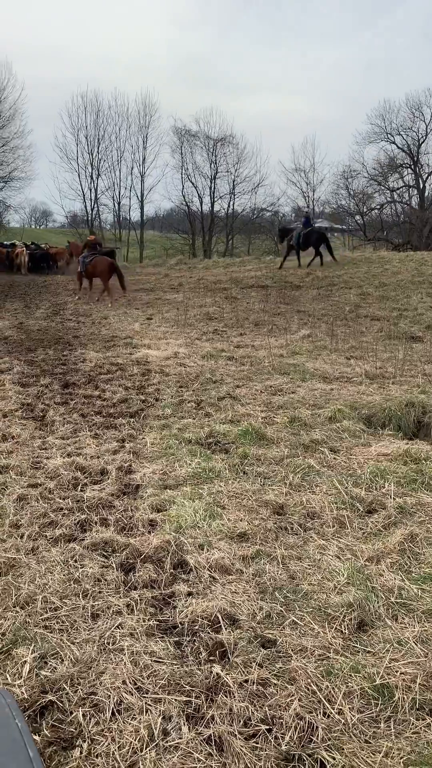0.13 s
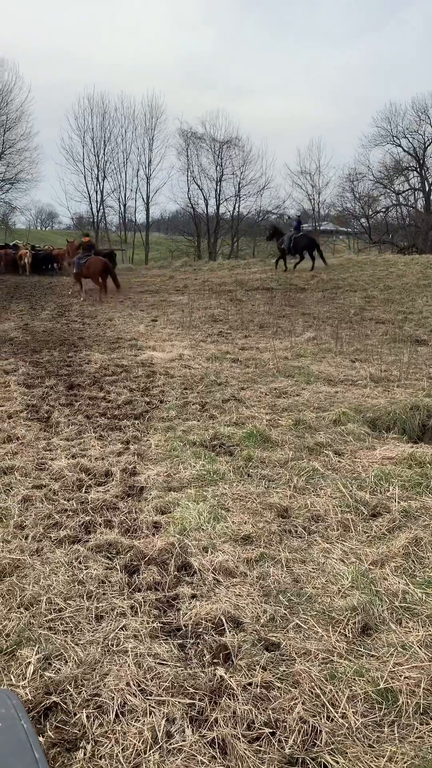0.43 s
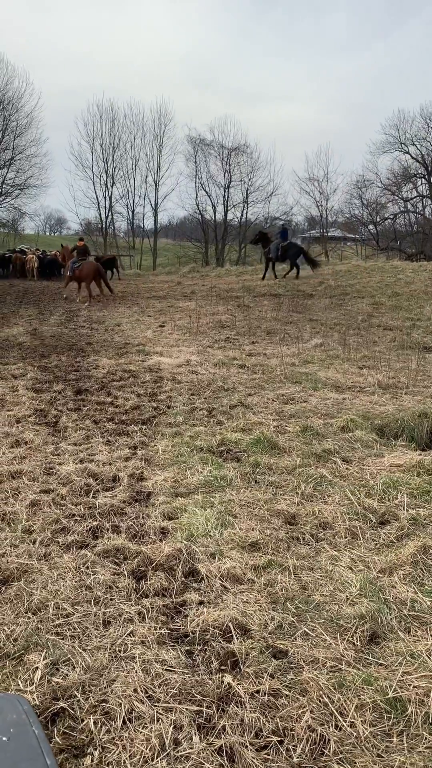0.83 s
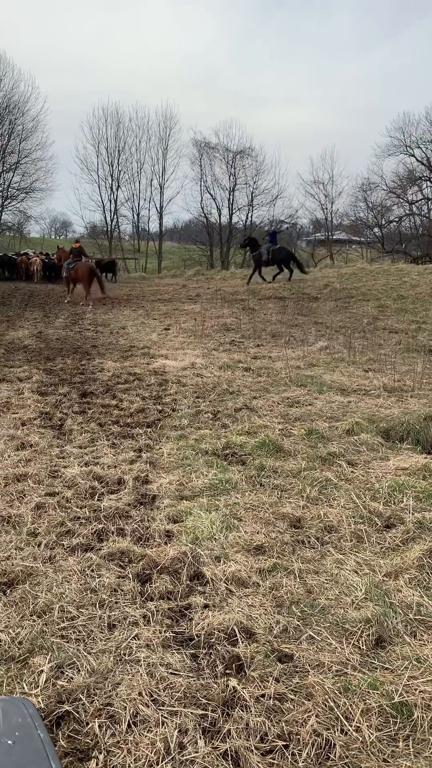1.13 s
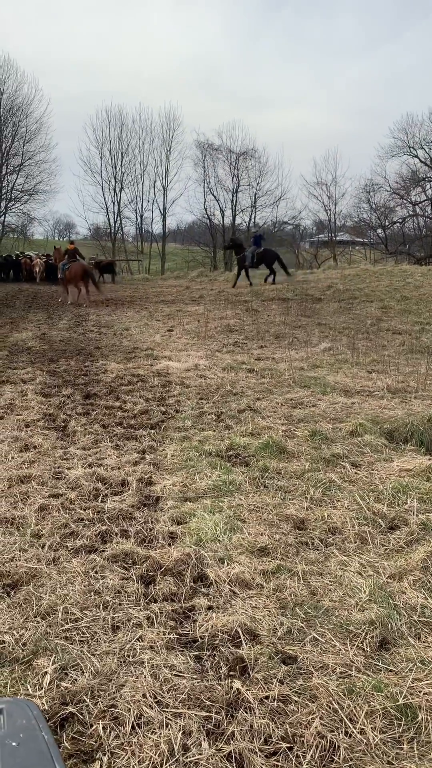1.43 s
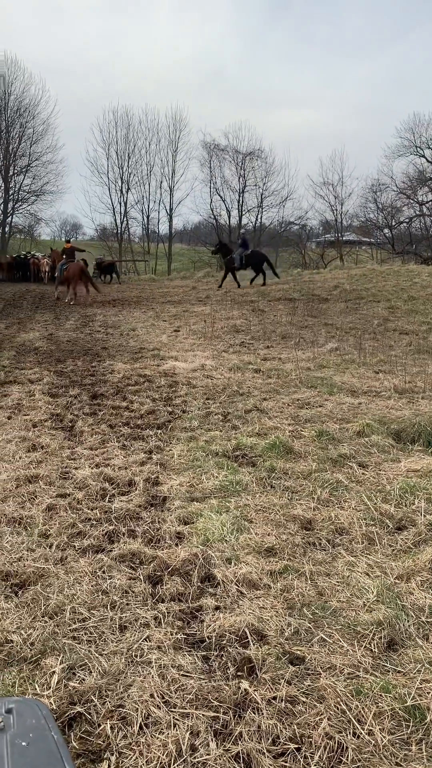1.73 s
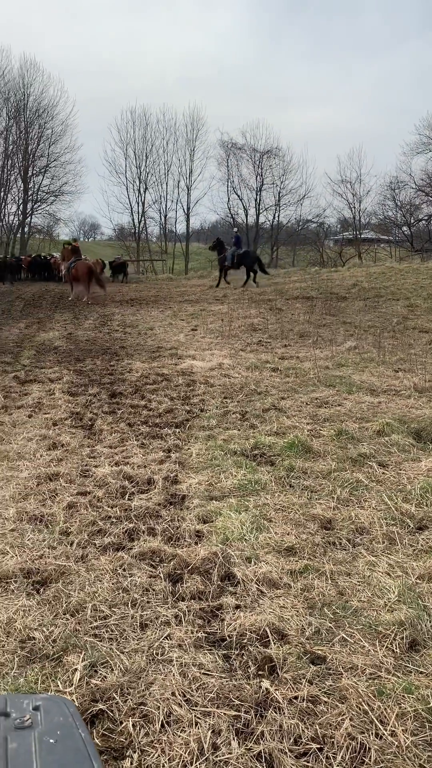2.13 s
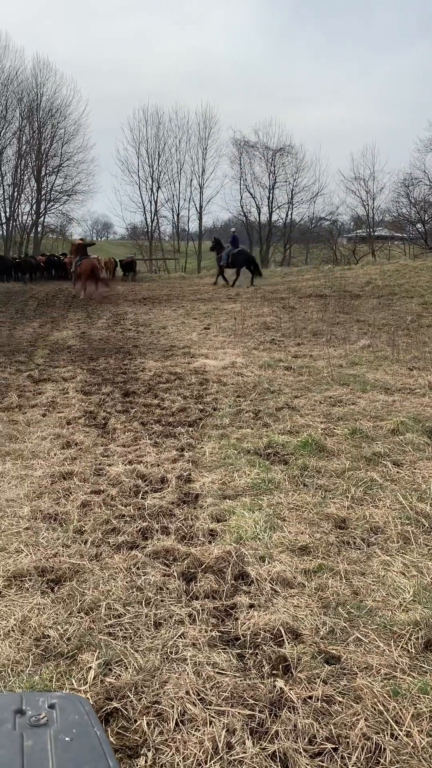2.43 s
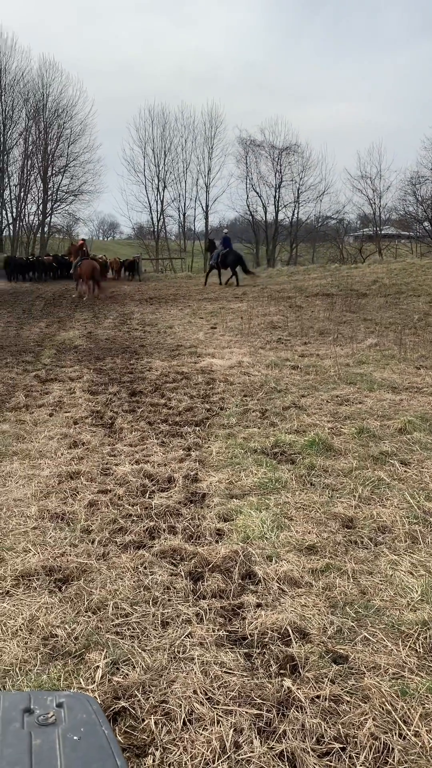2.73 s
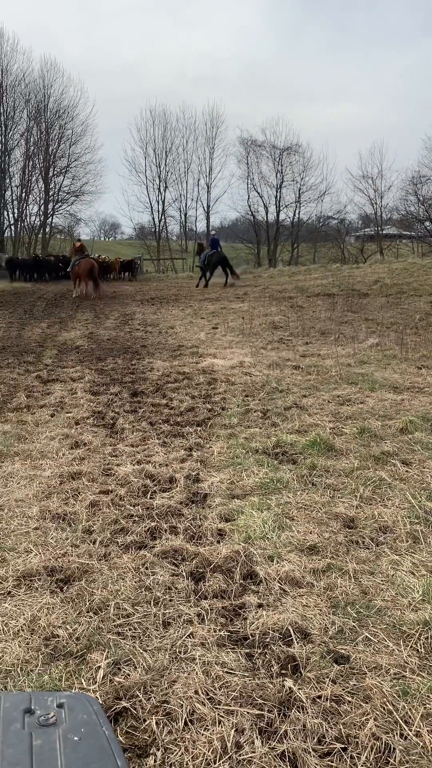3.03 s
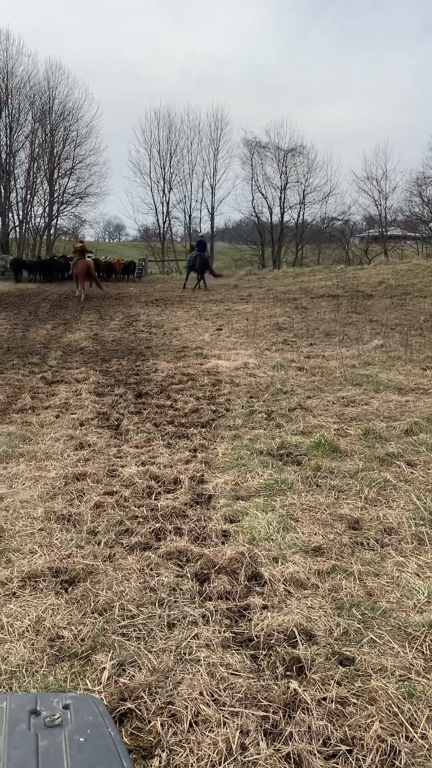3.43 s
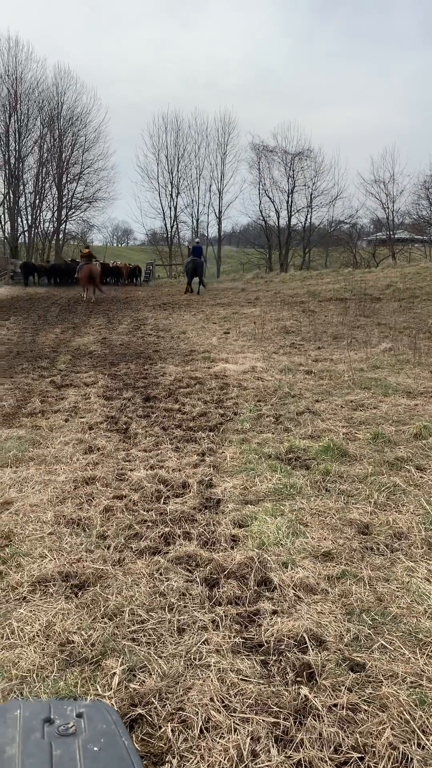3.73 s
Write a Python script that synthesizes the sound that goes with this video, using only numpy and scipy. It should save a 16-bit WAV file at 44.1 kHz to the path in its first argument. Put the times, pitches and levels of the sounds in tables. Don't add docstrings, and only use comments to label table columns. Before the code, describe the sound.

A whip cracks twice far across an open pasture, first a ragged cluster of snaps, then one sharper snap; both echo from ground and trees over low wind, faint hoof ticks and grass rustle, on a phone.

```python
import sys
import numpy as np
from scipy import signal
from scipy.fft import rfft, irfft, next_fast_len
from scipy.io import wavfile
from scipy.ndimage import uniform_filter1d

SR = 44100
rng = np.random.default_rng(int(sys.argv[2]) if len(sys.argv) > 2 else 0)


def file_out(sig):
    cols = np.atleast_2d(sig).T
    lim = np.clip(cols, -1, 1)
    pcm = np.round(lim * 32767).astype(np.int16)
    wavfile.write(sys.argv[1], SR, pcm)


def gain_from_decibels(decibels):
    exponent = np.asarray(decibels, float) / 20
    return 10 ** exponent


N = 171990
T = np.arange(N) / SR
M = next_fast_len(N + SR // 4)
F = np.maximum(np.arange(M // 2 + 1) * SR / M, 1)

# start in seconds, level in dB, hold in seconds, decay in seconds,
# tilt in dB per octave.
CRACK_BURSTS = [(1.042, -60, .001, .004, 3.0), (1.062, -44, .003, .001, 1), (1.0645, -29, .013, .001, -.3),
                (1.0998, -30, .0008, .001, -.4), (1.106, -36, .002, .002, .4), (1.108, -30, .008, .012, .8),
                (1.1745, -31, .004, .004, .5), (1.197, -33, .0015, .0015, .5),
                (1.2015, -33, .001, .0015, 0), (1.2125, -36, .006, .003, -.6),
                (1.430, -49, .001, .004, -1.5), (2.5605, -49, .004, .004, 4), (2.5805, -40, .001, .002, 5),
                (2.583, -43, .014, .002, 1.5), (2.5975, -36, .002, .001, .4),
                (2.6003, -20.5, .0002, .0003, 1.5), (2.6012, -28, .002, .0015, 2.5),
                (2.617, -45, .001, .001, 3), (2.628, -37, .002, .008, 2.5), (2.642, -29, .0008, .002, 1.5),
                (2.692, -41, .004, .004, .4), (2.703, -39, .003, .006, -.4), (2.7625, -37, .0005, .002, .4),
                (1.047, -53, .015, .002, -1), (1.392, -48, .002, .004, -1), (2.572, -48, .003, .003, 3),
                (2.72, -43, .0005, .001, 2), (2.729, -40, .006, .006, 0), (2.765, -42, .015, .006, 1),
                (2.85, -46, .008, .008, 1)]
# frequency in Hz, level in dB.
SHOCK_COLOUR = [(350, -30), (680, -14), (1450, -5), (2500, -7), (4100, -6), (5400, -16), (7500, -17.5),
                (13000, -32)]
# start in seconds, frequency in Hz, level in dB,
# 60 dB decay in seconds.
SHOCK_RINGS = [(1.0415, 3850, -47, .011), (1.065, 1394, -27.5, .05), (1.069, 3700, -36, .03),
               (1.11, 1750, -30, 0.041), (1.11, 3577, -26.5, 0.058), (1.177, 3330, -37, 0.036),
               (2.5793, 1723, -29.5, 0.017), (2.6018, 4160, -22.5, 0.025), (2.601, 1520, -24, 0.018),
               (2.6005, 2590, -31.5, 0.022), (2.627, 4220, -38, .04), (2.64, 1858, -21.5, 0.022),
               (1.066, 6300, -35, .012), (1.112, 7600, -41, 0.036), (2.5805, 7300, -35, 0.018),
               (2.601, 7400, -33, .015), (2.626, 7000, -40.5, .03), (2.642, 7600, -35, .015)]
# start in seconds, frequency in Hz, level in dB,
# 60 dB decay in seconds.
LOW_THUMPS = [
    (1.069, 225, -23.5, 0.037),
    (1.067, 252, -29.5, .045),
    (1.068, 360, -33.5, 0.042),
    (1.066, 703, -34, .045),
    (2.6, 720, -34, 0.035),
    (1.18, 700, -44.5, 0.25),
    (2.575, 183, -31.5, 0.062),
    (1.9, 169, -53.5, 0.053),
    (2.578, 600, -38, 0.053),
    (3.323, 670, -43.5, 0.017),
]
# crack time in seconds, near ground level in dB, tree line delay in
# seconds, tree line level in dB, far woods level in dB.
CRACK_ECHOES = [
    (1.064, -35.5, 0.11, -36, -37),
    (2.599, -37, 0.08, -40, -39.5),
]
ECHO_TILTS = (-0.1, 2.5)
# frequency in Hz, level in dB.
ECHO_COLOUR = [(200, -51), (700, -15.5), (1400, -4), (3000, -4), (4300, -8), (5400, -12), (7000, -11),
               (13000, -19.5)]
# start in seconds, length in seconds, start pitch in Hz, end pitch in Hz,
# level in dB.
LASH_WHISTLES = [(0.47, 0.032, 1300, 1560, -55.5), (0.486, 0.06, 1600, 1100, -55),
                 (0.492, 0.0905, 1100, 1400, -64.5), (0.885, 0.061, 1020, 1106, -59.5),
                 (.865, 0.052, 1400, 1150, -64), (0.956, 0.11, 960, 890, -67),
                 (2.425, 0.028, 1516, 1640, -59), (3.408, 0.07, 1297, 1877, -68.5),
                 (3.549, 0.042, 1458, 1500, -65.5), (3.785, 0.13, 1470, 1480, -65),
                 (3.807, 0.036, 1300, 1080, -65), (3.55, .04, 1120, 1100, -71),
                 (.25, 0.023, 1100, 1280, -70.5)]
# start in seconds, level in dB, tilt in dB per octave.
HOOF_TICKS = [(0.0232, -55.5, 7.5), (0.069, -45.5, 6), (.1035, -59, 10), (.134, -54, 11.5), (.161, -56, 16),
              (.25, -67, -3), (0.528, -54.5, 14.5), (0.53, -49.5, -3.5), (0.557, -57.5, 1.5),
              (.896, -68, -2), (1.718, -62, 6), (1.757, -74, -7), (1.832, -70, 0), (1.991, -59, -3.5),
              (2.247, -59.5, 4), (2.4573, -49, 0.5), (2.483, -57.5, 5), (2.496, -56.5, -3),
              (3.024, -68, -2), (3.068, -64, -8), (3.3229, -58.5, -2.5), (3.706, -54.5, 3.5)]
# start in seconds, level in dB, hold in seconds, decay in seconds,
# tilt in dB per octave.
GRASS_RUSTLES = [(.07, -65, 0.033, .02, 11.5), (.125, -63.5, 0.052, 0.021, 14),
                 (.235, -69.5, .025, .008, 8), (.532, -68, 0.032, .02, 2.5), (.585, -69, 0.015, 0.014, 9.5),
                 (2.24, -70, 0.034, 0.027, 5), (3.443, -65, 0.019, 0.0074, -2),
                 (3.53, -67, 0.063, 0.024, 0.5), (3.61, -69, 0.048, 0.019, 0.5),
                 (3.675, -63.5, 0.044, .012, 2), (3.8, -71, .05, .015, 4)]
# time in seconds, level in dB.
WIND_GUSTS = [(0, -53), (.15, -51.5), (.5, -52), (.85, -51.5), (1.0, -57), (1.3, -52), (1.8, -54.5),
              (1.92, -47.5), (2.3, -50), (2.42, -42), (2.48, -50), (2.6, -44), (2.66, -51), (2.9, -54),
              (3.35, -55.5), (3.75, -49.5), (3.87, -45)]
# frequency in Hz, level in dB.
WIND_COLOUR = [(20, -22.5), (45, -4), (68, -1), (140, -13), (220, -23), (400, -40.5), (600, -72)]
# time in seconds, treble lift in dB.
FIELD_SWELL = [(0, -7.5), (.15, -2.5), (.4, -5.5), (.6, 1), (.8, -1.5), (1.95, 5), (2.3, 3.5), (3.35, 2),
               (3.55, 5), (3.75, 2), (3.85, 6)]
# frequency in Hz, level in dB.
FIELD_COLOUR = [(300, -5), (560, 2.5), (680, -6), (900, -12.5), (1700, -13.5), (3800, -22.5), (6000, -31),
                (13000, -40.5)]
# frequency in Hz, level in dB.
HISS_COLOUR = [(4000, -20), (5600, -11), (6800, -0.5), (8000, -13.5), (13000, -14)]
# frequency in Hz, phase lead in radians.
PORT_LEAD = [(1600, 0.15), (2400, 1.67), (4200, 1.0), (6400, 6), (7500, 6), (8900, 10), (10600, 10),
             (13500, 14)]
# frequency in Hz, level in dB.
PORT_LEVEL = [(300, 2), (650, -2.5), (1300, -1.5), (2400, -1.5), (4300, -2.5), (7000, 0)]
# frequency in Hz, gain in dB.
MIC_RESPONSE = [(8800, 0), (9300, -10), (9700, -45), (10200, -16), (10600, 0), (13600, 0), (14100, -32),
                (15800, -46)]

BURST_GAIN_DB, FRONT, CROWD_DB = 2, 9, 4
NEAR_T60_S, TREE_RISE_S, TREE_HOLD_S, TREE_T60_S, FAR_T60_S = 0.69, 0.024, 0.092, 0.67, 1.305
AIR_DB_PER_S_AT_8K, ECHO_GRAIN_DB = 63, 1.4
SWISH_WIDTH_HZ = 95
TICK_HOLD_S, TICK_DECAY_S = 0.0006, 0.0012
FIELD_LEVEL_DB, HISS_DB = -67, -80.5
HUM_HZ, HUM_WIDTH_HZ, HUM_DB = 560, 25, -76.5
HUM_SWELL_S, HUM_SWELL_WIDTH_S, HUM_SWELL_DB = 3.234, 0.28, 9
MONO_BELOW_HZ = 340


def curve(table, x, log=False):
    a = np.array(table, float)
    if log:
        return np.interp(np.log(x), np.log(a[:, 0]), a[:, 1])
    return np.interp(x, a[:, 0], a[:, 1])


def unit(x):
    return x / np.sqrt(np.mean(x ** 2))


def causal(db, size):
    cepstrum = irfft(db * np.log(10) / 20, size)
    cepstrum[1:size // 2] *= 2
    cepstrum[size // 2 + 1:] = 0
    return np.exp(rfft(cepstrum))


def filt(x, response):
    return irfft(rfft(x, M) * response, M)[..., :N]


def walk(rate):
    hold = max(int(SR / rate), 2)
    steps = np.repeat(rng.standard_normal(N // hold + 1), hold)
    return 1.69 * uniform_filter1d(uniform_filter1d(steps, hold), hold)[:N]


def ports(x, other, apart):
    share = np.clip(apart, 0, 1)
    lead = curve(PORT_LEAD, F) * np.minimum(F / 1600, 1)
    half = gain_from_decibels(curve(PORT_LEVEL, F, True) / 2) * np.exp(.5j * lead)
    left = x * np.sqrt(1 - share ** 2) + share * other
    return np.array([filt(left, half), filt(x, 1 / half)])


def bands(table, lo_hz, count, shape):
    colour = gain_from_decibels(curve(table, F, True))
    out = 0
    for hz in lo_hz * 2 ** (np.arange(count) / 2):
        window = np.cos(np.clip(np.log2(F / hz) * 2, -1, 1) * np.pi / 2)
        out = out + filt(rng.standard_normal((2, N)), window * colour) * shape(hz)
    return out / np.sqrt(np.mean(colour ** 2))


def bursts(rows):
    size = 4096
    out, n = np.zeros((2, N + size)), np.arange(size)
    f = np.maximum(n[:size // 2 + 1] * SR / size, 20)
    for s, db, hold, decay, tilt_db in rows:
        noise = rng.standard_normal((3, size))
        u = n / SR / hold
        envelope = np.exp(-np.maximum(u - 1, 0) * hold / decay) * np.minimum(u * 4, 1)
        crowd = noise[:2] * gain_from_decibels(CROWD_DB * (noise[2] - 1)) * envelope
        crowd[0, 0] -= FRONT * np.exp(-hold / .002)
        colour = causal(curve(SHOCK_COLOUR, f, True) + tilt_db * np.log2(f / 2500), size)
        burst = irfft(rfft(crowd) * colour)
        peak = np.sqrt(np.max(uniform_filter1d(burst[0] ** 2, size=128)))
        i = int(s * SR)
        out[:, i:i + size] += burst * gain_from_decibels(db) / peak
    return ports(out[0, :N], out[1, :N], 0.4)


def cracks():
    return gain_from_decibels(BURST_GAIN_DB) * bursts(CRACK_BURSTS)


def rings(rows):
    out = 0
    for s, hz, db, t60 in rows:
        u = np.maximum(T - s, 0)
        envelope = gain_from_decibels(db - 60 * u / t60) * (1 - np.exp(-u * hz))
        out = out + envelope * np.sin(2 * np.pi * hz * u + 0.89 * walk(90))
    return ports(out, 0, 0)


def echoes():
    grain = gain_from_decibels(ECHO_GRAIN_DB * walk(400))

    def shape(hz):
        total = 0
        for (s, near_db, delay, tree_db, far_db), tilt_db in zip(CRACK_ECHOES, ECHO_TILTS):
            u, v = np.maximum(T - s, 0), np.maximum(T - s - delay, 0)
            rise = np.minimum(v / TREE_RISE_S, 1)
            near = (T > s) * gain_from_decibels(near_db - 60 * u / NEAR_T60_S)
            trees = rise * gain_from_decibels(tree_db - 60 * np.maximum(v - TREE_HOLD_S, 0) / TREE_T60_S)
            woods = rise * gain_from_decibels(far_db - 60 * v / FAR_T60_S)
            air_db = AIR_DB_PER_S_AT_8K * u * (hz / 8000) ** 1.505
            colour = gain_from_decibels(tilt_db * np.log2(hz / 2500) - air_db)
            total = total + (near ** 2 + trees ** 2 + woods ** 2) * colour ** 2
        return np.sqrt(total) * grain * gain_from_decibels(1.1 * walk(90))

    a, b = bands(ECHO_COLOUR, 161.4, count=14, shape=shape)
    return ports(a, b, 0.72)


def lash():
    out = np.zeros(N)
    for s, length, start_hz, end_hz, db in LASH_WHISTLES:
        u = np.clip((T - s) / length, 0, 1)
        z = filt(rng.standard_normal((2, N)), 1 / (1 + (F / SWISH_WIDTH_HZ) ** 2))
        phase = 2 * np.pi * np.cumsum(start_hz + (end_hz - start_hz) * u) / SR
        steady = z[0] + .9 * z[0].std()
        whistle = steady * np.cos(phase) + z[1] * np.sin(phase)
        out += gain_from_decibels(db) * np.sin(np.pi * u) ** .7 * unit(whistle)
    return ports(out, 0, 0)


def hoof_ticks():
    return bursts([(s, db, TICK_HOLD_S, TICK_DECAY_S, tilt_db) for s, db, tilt_db in HOOF_TICKS])


def grass_rustles():
    return bursts(GRASS_RUSTLES)


def wind():
    rumble = bands(WIND_COLOUR, 22, count=10, shape=lambda hz: gain_from_decibels(2 * walk(12)))[0]
    return unit(rumble) * gain_from_decibels(curve(WIND_GUSTS, T))


def field():
    swell = curve(FIELD_SWELL, T)

    def shape(hz):
        treble = np.clip(np.log2(hz / 500), 0, 1)
        return gain_from_decibels(treble * swell + 1.2 * walk(8) + 1.8 * walk(40))

    a, b = bands(FIELD_COLOUR, 250, count=13, shape=shape)
    return ports(a, b, 0.8) * gain_from_decibels(FIELD_LEVEL_DB)


def hum():
    resonance = 1 / (1 + ((F - HUM_HZ) / HUM_WIDTH_HZ) ** 2)
    tone = unit(filt(rng.standard_normal((2, N)), resonance))
    swell_db = HUM_SWELL_DB * np.exp(-((T - HUM_SWELL_S) / HUM_SWELL_WIDTH_S) ** 4)
    tone = tone * gain_from_decibels(HUM_DB + walk(2.75) + swell_db)
    return ports(tone[0], tone[1], 0.66)


def hiss():
    noise = filt(rng.standard_normal((2, N)), gain_from_decibels(curve(HISS_COLOUR, F, True)))
    a, b = unit(noise) * gain_from_decibels(HISS_DB + 0.95 * walk(4.8))
    return ports(a, b, 0.41)


def scene():
    whip = cracks() + rings(SHOCK_RINGS) + rings(LOW_THUMPS) + echoes() + lash()
    horses = hoof_ticks() + grass_rustles()
    return whip + horses + wind() + field() + hum() + hiss()


def low_pass(x):
    return signal.sosfilt(signal.butter(12, 14970, fs=SR, output="sos"), x)


def record(dry):
    mid, side = (dry[0] + dry[1]) / 2, (dry[0] - dry[1]) / 2
    side = filt(side, 1 / (1 + (MONO_BELOW_HZ / F) ** 4))
    mix = filt(np.array([mid + side, mid - side]), causal(curve(MIC_RESPONSE, F, True), M))
    return low_pass(mix)


dry = scene()
out = record(dry)
file_out(out)
```